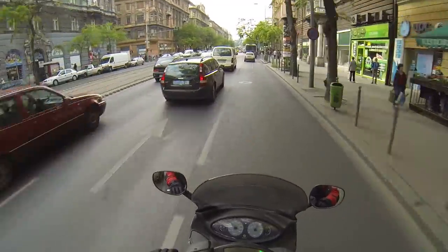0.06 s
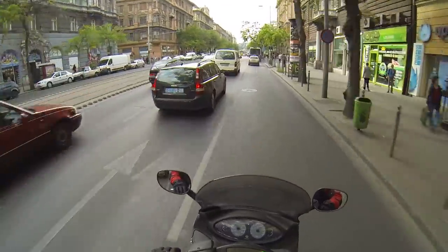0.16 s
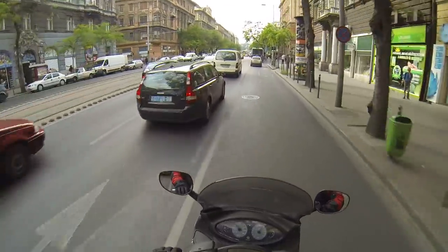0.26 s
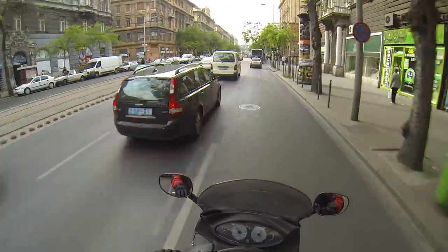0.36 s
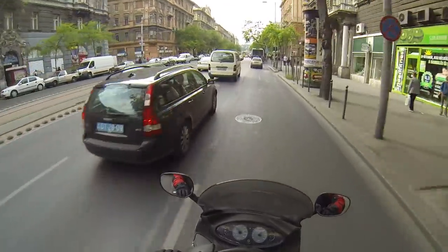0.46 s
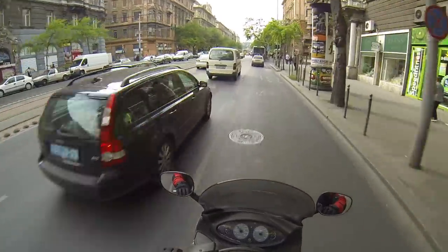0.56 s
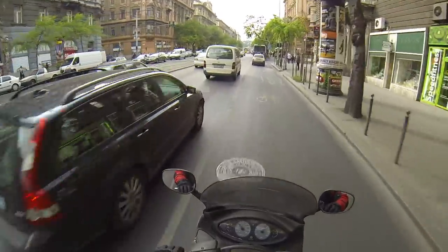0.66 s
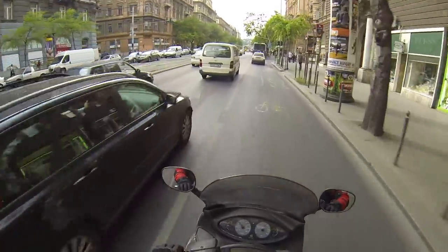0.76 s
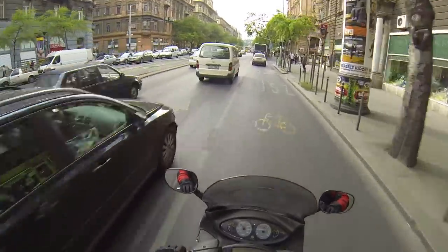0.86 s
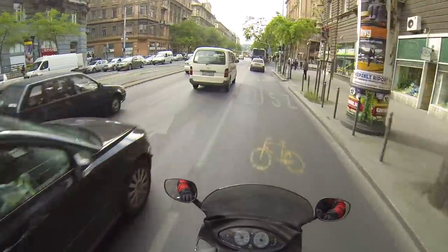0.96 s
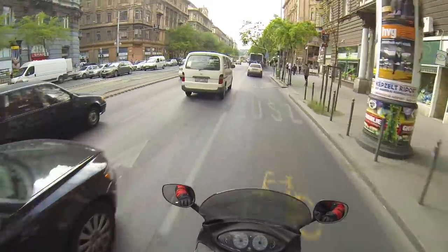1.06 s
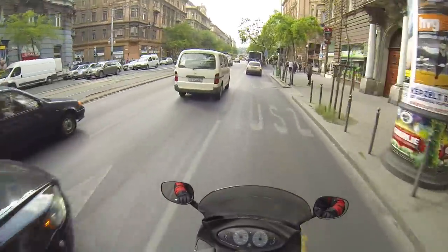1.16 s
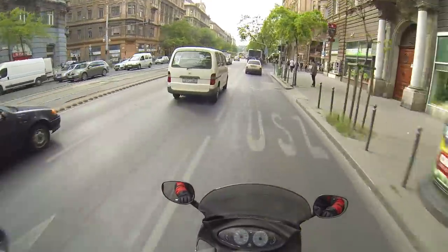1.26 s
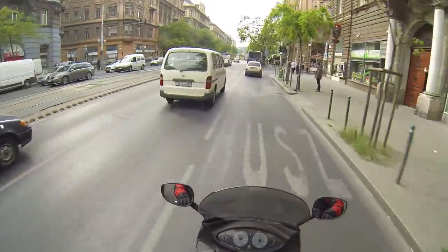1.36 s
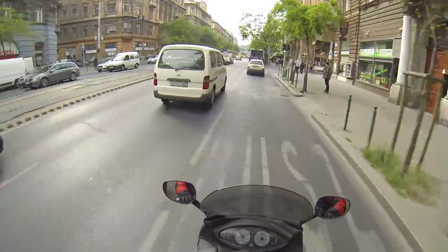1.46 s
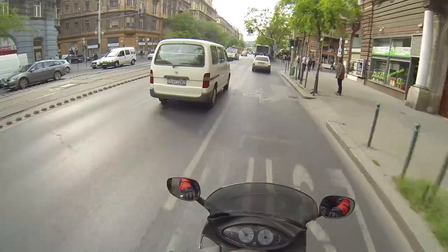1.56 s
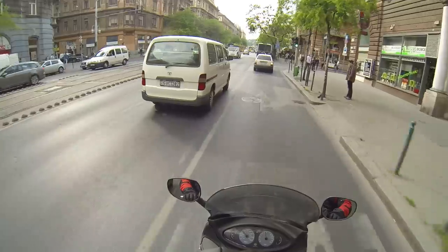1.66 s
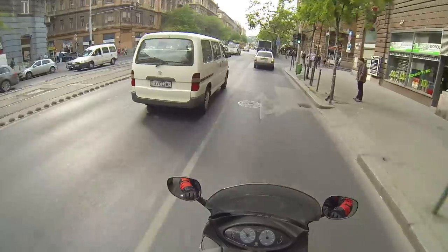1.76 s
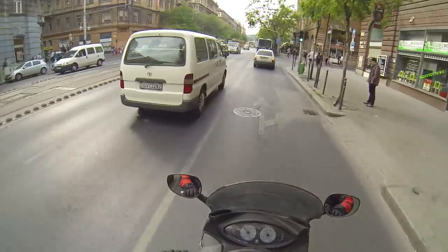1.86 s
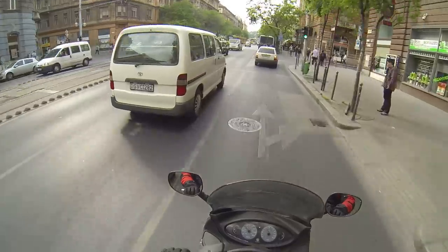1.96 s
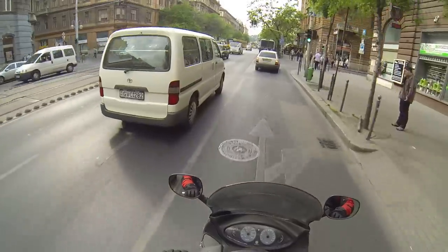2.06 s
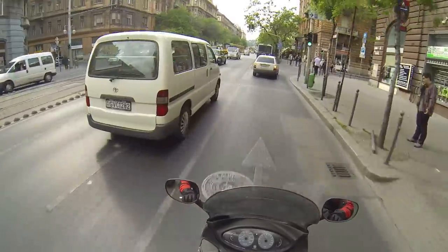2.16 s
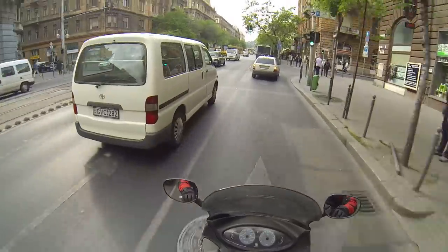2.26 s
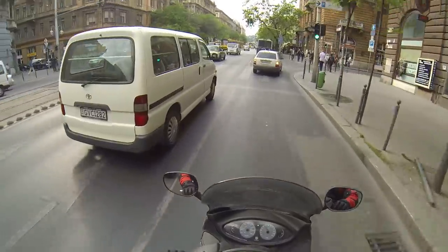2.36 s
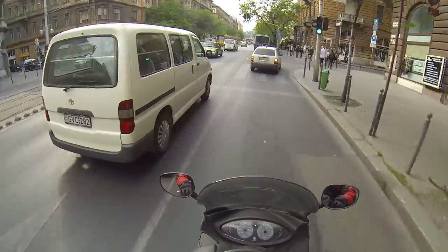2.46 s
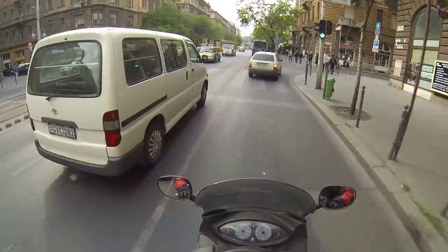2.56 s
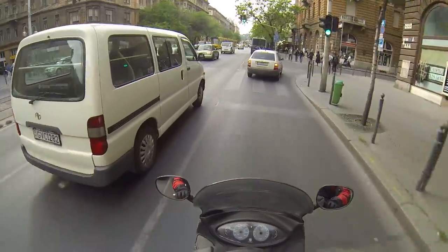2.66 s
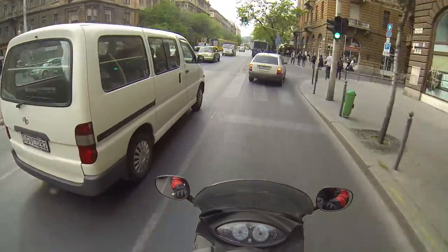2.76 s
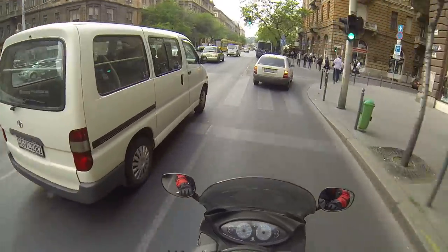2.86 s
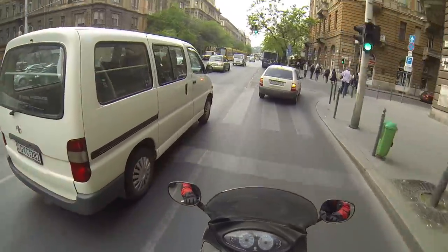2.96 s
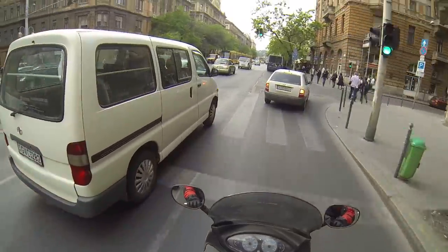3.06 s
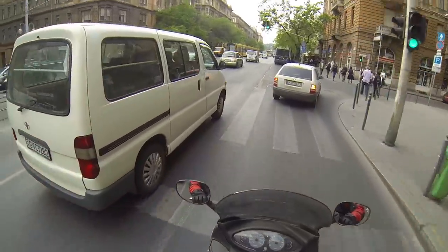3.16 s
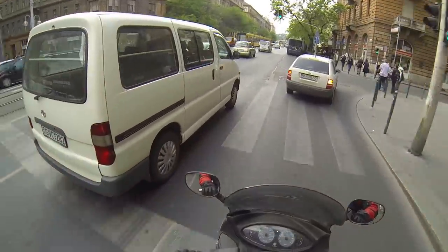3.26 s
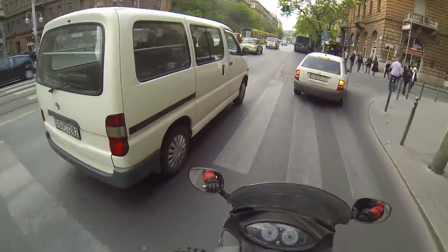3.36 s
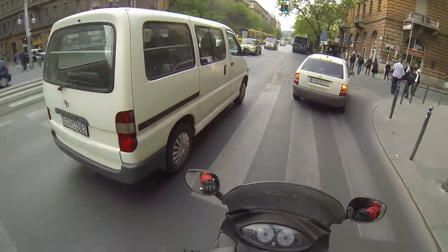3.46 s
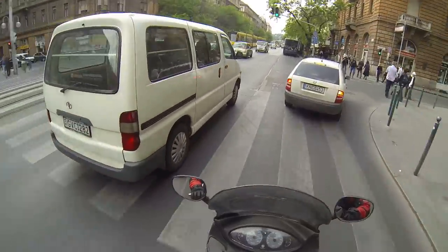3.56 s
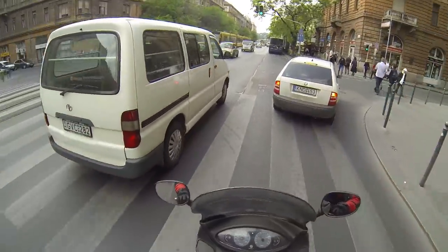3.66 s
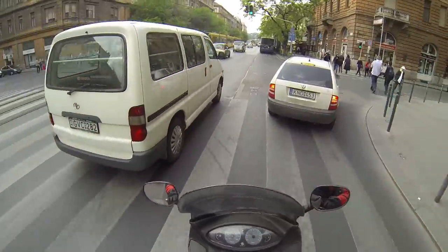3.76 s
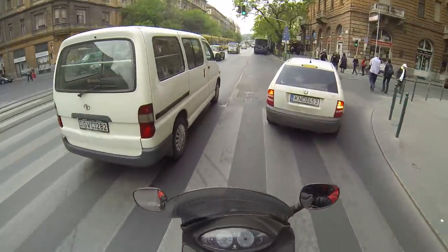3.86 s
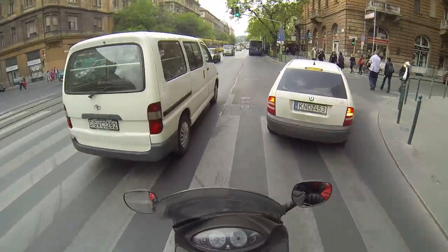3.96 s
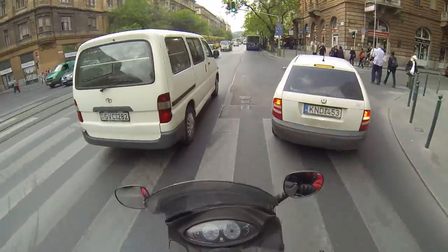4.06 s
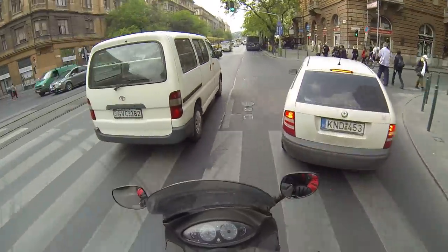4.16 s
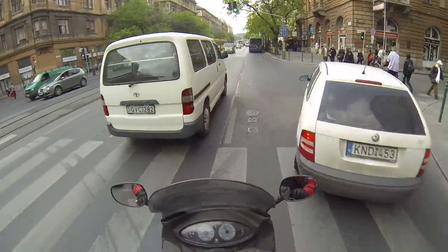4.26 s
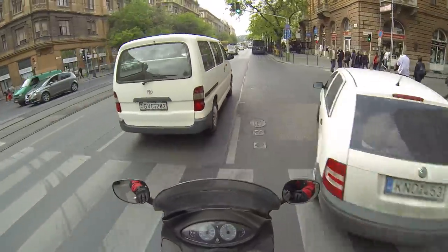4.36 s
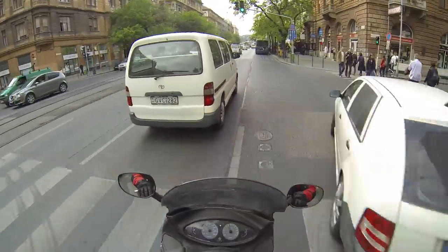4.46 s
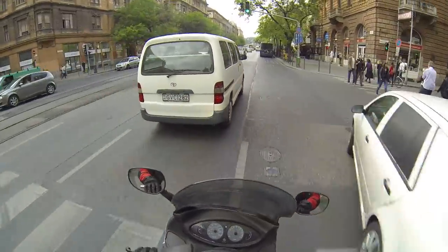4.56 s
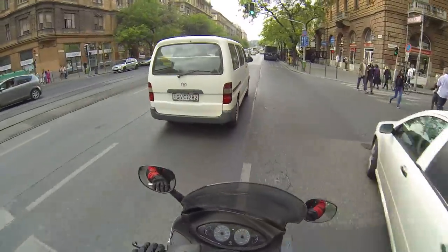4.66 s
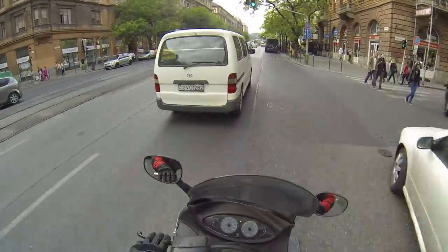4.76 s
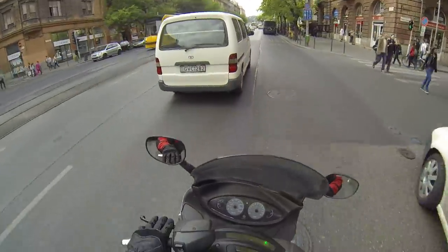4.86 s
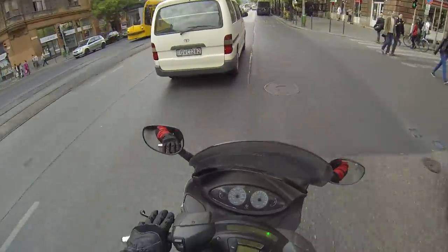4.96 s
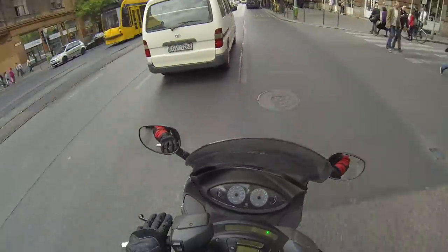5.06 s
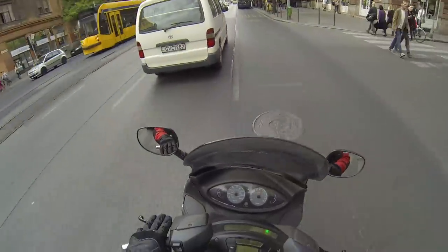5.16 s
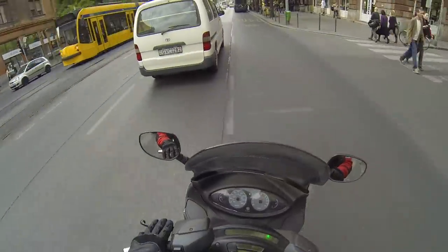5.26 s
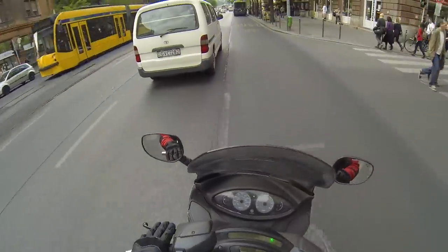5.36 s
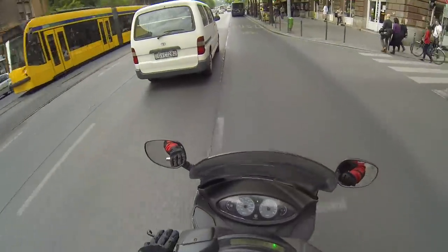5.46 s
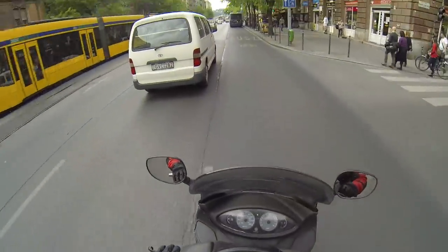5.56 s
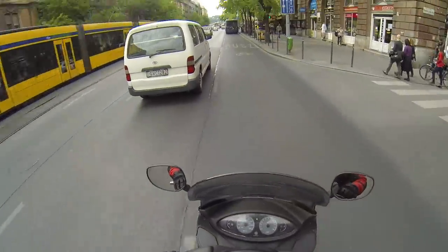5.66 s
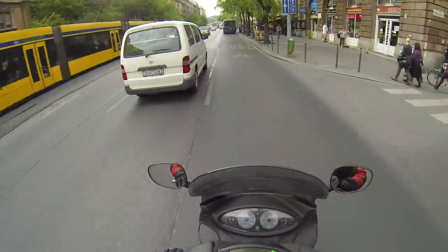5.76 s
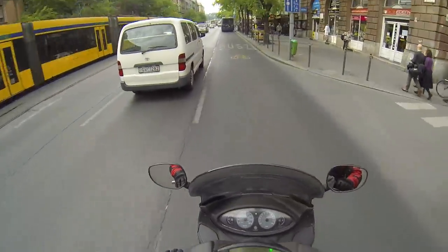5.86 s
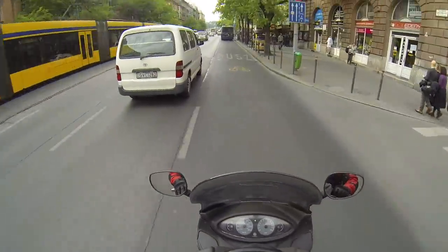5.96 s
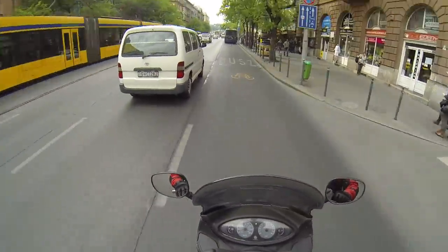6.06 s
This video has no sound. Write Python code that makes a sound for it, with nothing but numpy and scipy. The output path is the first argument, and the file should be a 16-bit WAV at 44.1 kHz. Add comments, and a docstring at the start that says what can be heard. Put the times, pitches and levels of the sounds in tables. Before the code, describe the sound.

Heard from the rider's seat, a scooter moves through city traffic in strong, deep wind buffeting, hiss and tyre roar. After it passes a car, the air calms and a thin, high brake rub ends in one short squeak. A turning car goes by softly, and the engine's pulsing hum climbs and levels off under renewed wind thumps and the soft rush of a passing tram.

```python
"""Wind thumps and rushes on a scooter rider's camera: eddies rock the housing and sound its hollow
cavity, over the roar of tyres on asphalt. The scooter passes a car, then slows behind a turning one;
the airflow drops, and friction makes the brake disc sing thinly and squeak once. Then the firing
pulses of the single-cylinder engine quicken into a rising drone as it pulls away and a tram goes by."""
import sys
import numpy as np
from scipy import signal
from scipy.fft import rfft, irfft, next_fast_len
from scipy.io import wavfile
from scipy.ndimage import uniform_filter1d, minimum_filter1d, map_coordinates

SR = 44100
rng = np.random.default_rng(int(sys.argv[2]) if len(sys.argv) > 2 else 0)


def put_to_file(sound):
    """Save the sound as 16-bit audio at rate SR, in the file named by the first command-line argument."""
    columns = np.atleast_2d(sound).T  # one column per channel
    safe = np.clip(columns, -1, 1)
    whole_steps = np.round(safe * 32767)
    wavfile.write(sys.argv[1], SR, whole_steps.astype(np.int16))


N = 269451

# airflow strength, which follows the riding speed: time_s, level_db
AIRFLOW = [(0, -1), (.25, -0.7), (.37, -2.5), (.74, -2), (1, 0), (1.53, -1.6), (1.78, -6), (2.3, -11.5),
           (2.7, -12), (2.84, -8.5), (3.04, -11.5), (3.16, -9.5), (3.26, -12.5), (3.55, -16.5), (4.42, -14),
           (4.56, -8.5), (6.11, -9)]
# large eddies striking the housing: peak_s, length_s, deep_db, upper_db
BUFFETS = [(0.156, 0.19, -9, -9), (0.296, 0.16, -6, -26), (0.467, 0.23, -11, -32), (0.663, 0.1, -10, -18),
           (0.887, 0.079, -12.5, -27), (1.07, 0.14, -9.5, -31), (1.382, 0.13, -12.5, -25),
           (1.633, 0.26, -15, -36), (1.793, 0.24, -13, -16.5), (1.941, 0.14, -10.5, -21),
           (2.12, 0.11, -11, -26), (2.367, 0.25, -18.5, -23.5), (2.493, .1, -22, -28),
           (2.737, 0.46, -22.5, -23.5), (2.875, 0.09, -13, -26), (2.97, 0.16, -18.5, -23.5),
           (3.254, 0.16, -18, -45), (3.777, 0.036, -14, -21), (4.566, 0.2, -15.5, -20),
           (4.895, 0.35, -11, -20.5), (5.832, 0.15, -20, -16), (5.964, 0.064, -20, -16.5),
           (6.058, 0.047, -18, -22)]
# jets of air across the cavity: peak_s, length_s, level_db, ring_share (0-1)
GUSTS = [(.201, 0.034, -17, 0.93), (0.469, 0.036, -26, 0.6), (0.59, 0.042, -24, .9),
         (0.619, .022, -22.5, 0.84), (0.751, 0.018, -21.5, 0.9), (0.849, 0.078, -23.5, 0.6),
         (0.911, 0.13, -25, .6), (1.032, 0.17, -26, 0.54), (1.531, 0.022, -23, 0.6),
         (2.135, 0.13, -37, 0.7), (2.85, .14, -42, 0.1), (4.253, .17, -41, 0.2)]
# rough patches of asphalt that swell the low roar and the treble fizz: peak_s, length_s, boost_db
ROUGH_PATCHES = [(0.198, .1, 3.5), (0.644, 0.07, 4.5), (0.853, 0.16, 4.5), (1.534, 0.11, 4), (1.668, .14, 4),
                 (2.22, .2, 2), (2.856, 0.17, 3)]
# engine speed: time_s, firing_hz
FIRING_RATE = [(4.4, 37), (4.75, 44), (5.0, 48.2), (5.4, 51.9), (5.6, 52.1), (5.87, 51), (6.11, 48.6)]
# engine load: time_s, level_db
THROTTLE = [(0, -44), (4.3, -50.5), (4.6, -46), (4.8, -39.5), (5.0, -36.5), (5.4, -38.5), (6.11, -36)]
# exhaust note: harmonic_number, relative_db
EXHAUST_HARMONICS = [(1, 2), (2, 3), (3, -1.5), (4, -14.5), (5, -4.5), (6, -5), (7, -8), (8, -9.5),
                     (9, -12.5), (10, -12), (11, -15.5), (12, -14)]
# drive belt taking up the load: time_s, level_db
BELT_LEVEL = [(4.6, -100), (4.85, -69), (5.05, -64), (5.26, -62), (5.32, -83), (6.11, -86.5)]
# overtaken car, turning car, tram: nearest_s, half_power_width_s, level_db, centre_hz
VEHICLES = [(1.3, 0.72, -39, 2400), (4.45, 0.5, -44.5, 450), (5.8, 1.1, -41, 1230)]
# pads rubbing on the brake disc: time_s, level_db
PAD_LEVEL = [(1.6, -71), (1.9, -72), (2.2, -66), (2.6, -68), (3.0, -68), (3.43, -62), (3.55, -65),
             (3.7, -100)]
# whistle of the disc's highest mode: time_s, level_db
WHISTLE_LEVEL = [(1.3, -110), (1.95, -77), (2.3, -74), (2.65, -82), (3.05, -76), (3.45, -74), (3.76, -67),
                 (4.05, -110)]
# chirps of its other high modes: peak_s, length_s, pitch_hz, level_db
DISC_CHIRPS = [(1.8, .09, 13540, -82), (2.995, .07, 12850, -70), (3.1, .11, 13380, -74),
               (3.29, .14, 13345, -67)]
# one brake squeak: time_s, pitch_hz, level_db
SQUEAK = [(3.78, 6690, -80), (3.805, 6650, -64), (3.83, 6560, -68), (3.87, 6530, -59), (3.905, 6470, -56),
          (3.928, 6630, -61.5), (3.945, 6620, -85)]

# noise spectra, each with the columns: frequency_hz, relative_density_db
HOUSING_DEEP = [(8, -34.5), (23, -28.5), (31, -11.5), (39, 5), (46, -8.5), (54, -19), (66, -33)]  # lower resonance of the housing
HOUSING_UPPER = [(40, -17), (50, -5.5), (57, 0.5), (62, -11), (70, -21.5), (90, -50.5)]  # its upper resonance
CAVITY_FAST = [(500, -40), (850, -20.5), (1100, -10.5), (1200, -2), (1280, 1.5), (1380, -4.5), (1570, -5.5),
               (1850, -18.5), (2400, -48)]  # cavity in fast air
CAVITY_SLOW = [(500, -47), (850, -20), (1100, -12), (1235, 0.5), (1330, -2), (1450, -3), (1600, -4.5),
               (1850, -20), (2400, -30.5)]  # cavity in slow air
EDGE_HISS = [(700, -8), (1750, -0.5), (2000, -0.5), (2250, -2), (2600, 0), (3100, -6), (3650, -4.5),
             (4350, -18), (5000, -15), (6100, -21), (7700, -25.5), (8900, -34), (13000, -40.5),
             (15000, -45)]  # air passing the housing's edges
WIND_FIZZ = [(3800, -18), (4900, 6.5), (5600, -3), (6150, -4.5), (6550, -3), (7000, -10), (7600, -6),
             (8700, -17), (13500, -23.5), (15000, -32)]  # treble of the strongest airflow
TYRE_ROAR = [(40, -23.5), (78, -3), (103, 10), (130, 2), (170, 0.5), (220, -5), (360, -9), (402, 0),
             (435, -8), (640, -14.5), (735, -4), (790, -18.5), (1100, -8), (2500, -33.5)]  # tyres on asphalt
ENGINE_GROWL = [(70, -10), (120, -4), (200, 1.5), (300, -2.5), (550, -8.5), (900, -10.5), (1400, 1.5),
                (2000, -11), (4000, -33)]  # exhaust and intake between the harmonics
BELT_RASP = [(3000, -21), (4600, -3), (5000, 3.5), (5700, -22), (6300, 4), (6800, -18), (7400, -4.5),
             (8300, -18), (8900, -10.5), (9500, -17), (10200, -7), (11300, -23), (15000, -30)]  # drive belt
MICROPHONE_FLOOR = [(2000, 2), (6000, 8), (9000, 1.5), (11500, 4.5), (15000, -4.5)]  # microphone self-noise
TRAFFIC_ROAR = [(60, 11), (110, 15.5), (200, 7), (300, 2), (520, -1), (800, -7.5), (2000, -7), (3700, -9.5),
                (4400, -26.5), (7500, -31), (12000, -46)]  # broad roar common to all vehicles
PAD_RUB = [(3500, -29), (4900, -17), (5150, -6.5), (5280, 5), (5450, -7.5), (5900, -14.5), (7800, -13.5),
           (8700, -19), (9700, -23.5), (10500, -22), (15000, -27.5)]  # pads sliding on the disc


def amp(db):
    """Amplitude ratio of a level in decibels."""
    return np.exp(np.asarray(db) * (np.log(10) / 20))


def unit(x):
    """The signal scaled to rms 1."""
    return x / np.sqrt(np.mean(x ** 2) + 1e-20)


def curves(rows):
    """Linear interpolation of each column after the time, one value per sample."""
    times, *columns = np.transpose(rows)
    return [np.interp(np.arange(N) / SR, times, column) for column in columns]


def wobble(rate_hz):
    """Smooth random fluctuation: a spline through rate_hz Gaussian knots a second."""
    knots = rng.standard_normal(int(N * rate_hz / SR) + 4)
    coarse = np.arange(0, N + 24, 24)
    return np.interp(np.arange(N), coarse, map_coordinates(knots, [coarse * rate_hz / SR]))


def swell(peak_s, length_s):
    """Half-cosine envelope: one rounded rise and fall."""
    offset = (np.arange(N) / SR - peak_s) / length_s
    return np.cos(np.pi * offset, out=np.zeros(N), where=np.abs(offset) < .5)


def filtered(x, response):
    """Linear filtering: the spectrum is multiplied by a frequency response."""
    size = next_fast_len(N + SR // 2)
    return irfft(rfft(x, size) * response(np.fft.rfftfreq(size, 1 / SR)), size)[:N]


def noise(spectrum):
    """White noise shaped to a spectrum, at rms 1."""
    knots_hz, db = np.transpose(spectrum)
    white = rng.standard_normal(N)
    return unit(filtered(white, lambda hz: amp(np.interp(np.log(hz + 1), np.log(knots_hz), db, right=-120))))


def phase_of(hz):
    """Phase as the time integral of frequency."""
    return 2 * np.pi * np.cumsum(hz) / SR


def airflow_gain(full_db, exponent):
    """Power law: a layer gains exponent dB for each dB of airflow."""
    return amp(full_db + exponent * curves(AIRFLOW)[0])


def rough_patch_boost_db():
    """Amplitude modulation: rough patches of asphalt briefly swell the low roar and the treble fizz."""
    return sum(db * swell(peak_s, length_s) for peak_s, length_s, db in ROUGH_PATCHES)


def resonance(spectrum, envelope):
    """A randomly driven resonance gives narrow-band noise, here levelled to follow an envelope."""
    band = noise(spectrum)
    power = uniform_filter1d(np.abs(signal.hilbert(band)) ** 2, size=2500)
    return envelope * unit(band / np.sqrt(np.abs(power)))


def buffeting(churn_db=3.5, churn_hz=14, low_hz=23, high_hz=71):
    """Forced vibration: small eddies churn and large ones thump, rocking the housing at two resonances."""
    deep = airflow_gain(-18, 0.8) * amp(churn_db * wobble(churn_hz))
    upper = airflow_gain(-22, 0.74) * amp(churn_db * wobble(churn_hz))
    for peak_s, length_s, deep_db, upper_db in BUFFETS:
        eddy = swell(peak_s, length_s)
        deep = np.hypot(deep, amp(deep_db) * eddy)
        upper = np.hypot(upper, amp(upper_db) * eddy)
    push = resonance(HOUSING_DEEP, deep) + resonance(HOUSING_UPPER, upper)
    # the housing cannot follow fast pushes, so even sudden gusts stay deep
    return filtered(push, lambda hz: 1 / np.sqrt(1 + (low_hz / (hz + 1)) ** 8 + (hz / high_hz) ** 20))


def wind(flutter_db=0.77, slow_db=-8, span_db=7):
    """Turbulence excites the modes of the housing's cavity and hisses past its edges."""
    eddies = wobble(45)
    # fast air favours the cavity's lowest peak, slow air spreads over its neighbours
    fast = np.clip((curves(AIRFLOW)[0] - slow_db) / span_db, 0, 1)
    cavity = np.sqrt(fast) * noise(CAVITY_FAST) + np.sqrt(1 - fast) * noise(CAVITY_SLOW)
    jets = sum(amp(db) * np.sqrt(1 - ring_share) * swell(peak_s, length_s)
               for peak_s, length_s, db, ring_share in GUSTS)
    hollow = np.hypot(airflow_gain(-27.5, 0.96), jets) * unit(cavity * amp(flutter_db * eddies))
    hiss = airflow_gain(-35.5, 1.046) * unit(noise(EDGE_HISS) * amp(0.7 * eddies + 0.7 * wobble(120)))
    fizz_gain = airflow_gain(-49.8, 1.94) * amp(0.76 * rough_patch_boost_db())
    fizz = fizz_gain * unit(noise(WIND_FIZZ) * amp(1.5 * wobble(70)))
    return hollow + hiss + fizz


def tyres():
    """Rolling noise: tyres on asphalt give a low roar that grows with speed; rough patches briefly swell it."""
    roar = unit(noise(TYRE_ROAR) * amp(0.7 * wobble(13)))
    return airflow_gain(-34.5, 0.85) * amp(rough_patch_boost_db()) * roar


def engine(jitter=0.0024, rough_db=0.5, uneven_db=1.5, growl_db=-9):
    """Periodic firing gives a harmonic exhaust note and modulates the growl and the belt's rasp."""
    phase = phase_of(curves(FIRING_RATE)[0] * (1 + jitter * wobble(25)))
    harmonics = sum(amp(db + rough_db * wobble(9)) * np.sin(k * phase + rng.uniform(0, 2 * np.pi))
                    for k, db in EXHAUST_HARMONICS)
    pulses = amp(4 * np.cos(phase))
    belt = unit(noise(BELT_RASP) * pulses)
    growl = amp(growl_db) * unit(noise(ENGINE_GROWL) * pulses)
    note = unit(harmonics * amp(uneven_db * wobble(30)))  # some firings puff harder than others
    return amp(curves(THROTTLE)[0]) * (note + growl) + amp(curves(BELT_LEVEL)[0]) * belt


def microphone_hiss(hiss_db=-74, whine_hz=11299, whine_db=-89):
    """Self-noise of the microphone: a steady hiss with a faint, fluttering whine in it."""
    whine = unit(amp(4 * wobble(40)) * np.sin(phase_of(whine_hz + 14 * wobble(90))))
    return amp(hiss_db) * noise(MICROPHONE_FLOOR) + amp(whine_db) * whine


def cavity_ring(ring_hz=1285, waver_hz=35):
    """Cavity resonance: brief jets of air swell into an almost pure tone."""
    envelope = sum(amp(db) * np.sqrt(ring_share) * swell(peak_s, length_s) ** 2
                   for peak_s, length_s, db, ring_share in GUSTS)
    return envelope * unit(np.sin(phase_of(ring_hz + waver_hz * wobble(100))))


def traffic(hump_db=11, hump_octaves=0.77):
    """Spherical spreading: each vehicle roars in its own register, falling off inversely with distance."""
    t, out = np.arange(N) / SR, np.zeros(N)
    for nearest_s, width_s, db, centre_hz in VEHICLES:
        roar = filtered(noise(TRAFFIC_ROAR),
                        lambda hz: amp(hump_db * np.exp(-(np.log2((hz + 1) / centre_hz) / hump_octaves) ** 2)))
        relative_distance = np.hypot(1, 2 * (t - nearest_s) / width_s)
        out += amp(db) * unit(roar) / relative_distance
    return out


def brake_rub():
    """Sliding friction of the pads on the disc makes an uneven, high noise."""
    return amp(curves(PAD_LEVEL)[0]) * unit(noise(PAD_RUB) * amp(3.3 * wobble(46)))


def disc_singing(whistle_hz=14420, waver_hz=70, wander_hz=60, patchy_db=4):
    """Friction excites the disc's high modes: the highest whistles on while the others chirp."""
    waver = waver_hz * wobble(400)
    chirps = sum(amp(db) * swell(peak_s, length_s) * np.sin(phase_of(hz + waver))
                 for peak_s, length_s, hz, db in DISC_CHIRPS)
    whistle_gain = amp(curves(WHISTLE_LEVEL)[0] + 3.5 * wobble(11))
    whistle = whistle_gain * np.sin(phase_of(whistle_hz + waver + wander_hz * wobble(6)))
    return (chirps + whistle) * amp(patchy_db * wobble(50))


def brake_squeak(waver_hz=24, echo_db=-6):
    """Friction-induced vibration: the gripping brake gives one wavering tone, which the street echoes."""
    t = np.arange(N) / SR
    hz, db = curves(SQUEAK)
    gripping = (t > SQUEAK[0][0]) & (t < SQUEAK[-1][0])
    envelope = gripping * amp(db + 3.9 * wobble(80))
    squeak = envelope * np.sqrt(2) * np.sin(phase_of(hz + waver_hz * wobble(200)))
    return squeak + amp(echo_db) * street_echo(squeak, t60_s=0.7)


def street_echo(x, t60_s):
    """Reverberation: diffuse reflections from the house fronts decay exponentially."""
    t = np.arange(SR) / SR
    tail = rng.standard_normal(SR) * amp(-60 * t / t60_s)
    return signal.fftconvolve(x, tail / np.linalg.norm(tail))[:N]


def scene():
    """Superposition: the pressures of all sources add at one microphone."""
    air = buffeting() + wind() + cavity_ring()
    vehicles = tyres() + traffic() + engine()
    brakes = brake_rub() + disc_singing() + brake_squeak()
    return (air + vehicles + brakes + microphone_hiss())[None]


def record(dry, ceiling=0.87, top_hz=15100):
    """Peak limiting eases down the highest crests; a low-pass filter sets the camera's bandwidth."""
    needed = np.minimum(1, ceiling / (np.abs(dry) + 1e-9))
    gain = uniform_filter1d(minimum_filter1d(needed, size=1500), size=1500)
    return np.array([filtered(x, lambda hz: hz < top_hz) for x in dry * gain])


dry = scene()
out = record(dry)
put_to_file(out)
```